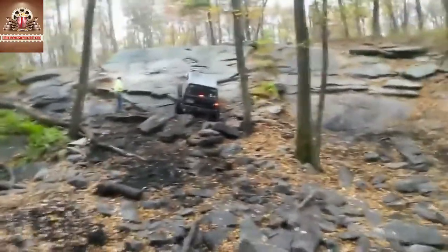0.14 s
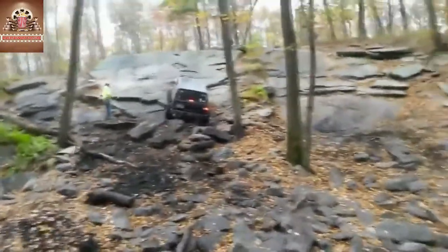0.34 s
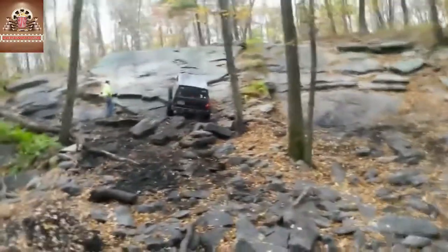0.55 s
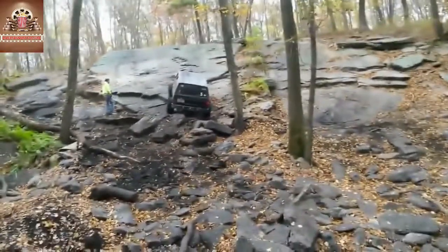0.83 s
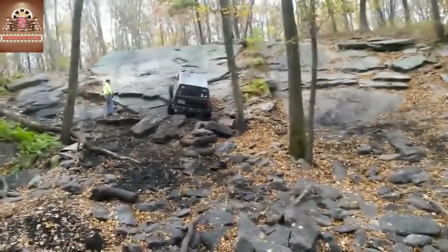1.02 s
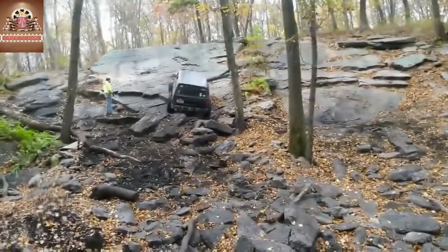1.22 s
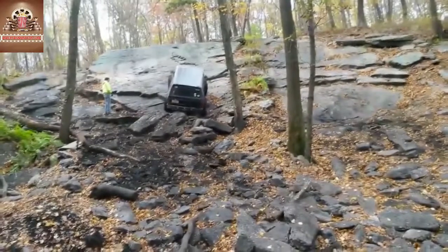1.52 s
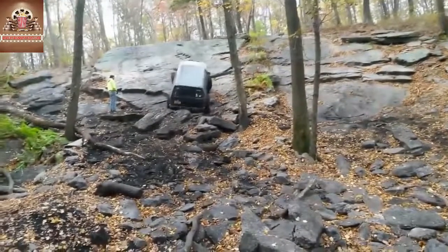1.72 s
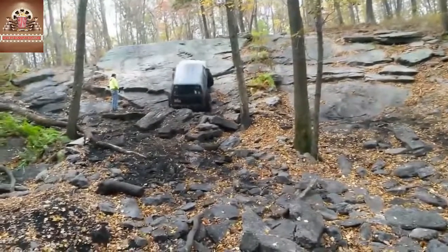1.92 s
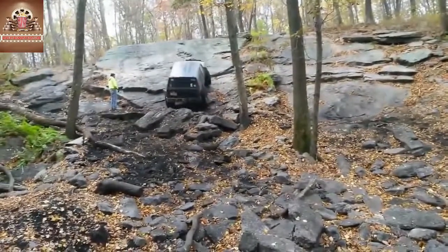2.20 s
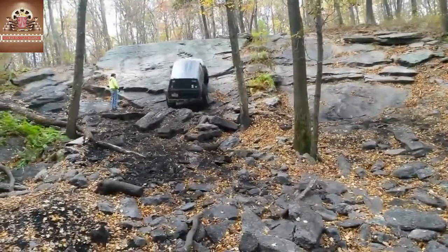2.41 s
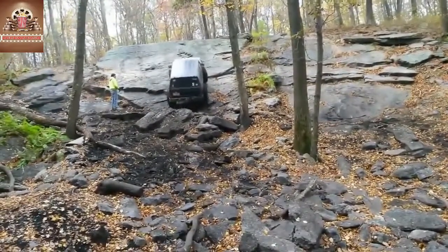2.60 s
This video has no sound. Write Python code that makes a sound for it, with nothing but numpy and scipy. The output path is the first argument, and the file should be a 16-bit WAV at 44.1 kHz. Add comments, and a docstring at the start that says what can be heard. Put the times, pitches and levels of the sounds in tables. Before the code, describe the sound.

In the woods, an off-road vehicle's engine goes from a soft chug to hard revving, popping briefly and climbing in pitch under a loud rush of air. Tyres slip on the rock ledge and a stone snaps once.

```python
"""Off-road vehicle climbing a rock ledge

A six-cylinder engine idles in the woods, then revs hard and climbs. The exhaust, a sum of multiples
of the engine cycle coloured by the pipe, goes from a chug through a few hard pops to a rising drone
that ends in a snarl, under a rush of fan and intake air. The tyres chirp and scuff on the rock and
a stone snaps once. Ledge and trunks echo the engine; a fine hiss lies behind."""
import sys
import numpy as np
from scipy import signal
from scipy.fft import rfft, irfft
from scipy.io import wavfile
from scipy.ndimage import uniform_filter1d

SR = 44100
rng = np.random.default_rng(int(sys.argv[2]) if len(sys.argv) > 2 else 0)


def unload_wav(signal):
    """Save mono or channel-first audio to the path in sys.argv[1] as 16-bit WAV at rate SR, clipped to [-1, 1]."""
    wavfile.write(
        sys.argv[1],
        SR,
        np.round(np.clip(np.atleast_2d(signal).T, -1, 1) * 32767).astype(np.int16),
    )


N = 121275
TIME = np.arange(N) / SR
CYLINDERS = 6

# exhaust pipe response: f/Hz, gain/dB
PIPE_RESPONSE = [(20, -34), (45, -11.5), (70, -1), (110, 3), (140, 4.5), (175, -5), (212, -3.5), (250, -13),
                 (290, -11.5), (390, -11.5), (470, -17), (510, -24.5), (560, -10.5), (590, -22.5),
                 (668, -15), (700, -26), (732, -15), (770, -24), (825, -12.5), (885, -20), (960, -16.5),
                 (1125, -23), (1350, -35), (2600, -36)]


def exhaust(firing_hz, firings, orders=60):
    """Under load the pipe sounds the firing tone, its overtones and uneven-firing lines between."""
    drone_levels = [(.8, -58, -60), (.86, -36, -28), (.905, -29, -17), (1.025, -13, -12),
                    (1.13, -16.5, -17), (1.204, -11, -27), (1.322, -9, -18), (1.39, -6.5, -22.5),
                    (1.5, -9.5, -27.5), (1.61, -12.5, -24.5), (1.70, -17, -26.5), (1.75, -13, -30),
                    (1.81, -16, -34), (2.09, -15.5, -28.5), (2.21, -14.5, -27.5), (2.36, -14.5, -26),
                    (2.45, -12, -47), (2.6, -13, -30), (2.64, -21, -25.5), (2.69, -15, -44),
                    (2.725, -28, -30)]  # t/s, firing tone/dB, octave/dB
    burble_levels = [(.8, -49, -40.5), (.9, -19.5, -45), (1.05, -32, -43), (1.2, -27.5, -31),
                     (1.6, -27, -38.5), (1.76, -39, -35), (1.98, -44, -30.5), (2.2, -32, -32),
                     (2.45, -38, -32.5), (2.65, -33, -26.5), (2.75, -40, -25)]  # t/s, higher overtones/dB, uneven firing/dB
    uneven_orders = [(1, -23), (2, -1), (4, -2), (5, 1.5), (7, 2), (8, 1), (10, 7), (14, 2), (20, -3),
                     (60, 4)]  # multiple of engine cycle, gain/dB
    overtones = [(3, 2), (4, -4), (5, -9), (6, -2.5), (7, -10.5), (12, -10)]  # multiple of firing rate, gain/dB
    odd_db = -5.5  # odd orders are weaker: the two banks fire in turn
    tone_db, octave_db = curves(drone_levels)
    overtone_gain, uneven_gain = amp(curves(burble_levels))
    out = amp(tone_db) * engine_order(firing_hz, firings, CYLINDERS, waver=.045)
    out += amp(octave_db) * engine_order(firing_hz, firings, 2 * CYLINDERS, waver=.19)
    for order in range(1, orders + 1):
        pipe_db = spectrum_at(PIPE_RESPONSE, firing_hz * order / CYLINDERS)
        if order % CYLINDERS:
            db = pipe_db + np.interp(order, *np.transpose(uneven_orders)) + odd_db * (order % 2)
            out += uneven_gain * amp(db) * engine_order(firing_hz, firings, order, waver=.32)
        elif order > 2 * CYLINDERS:
            db = pipe_db + np.interp(order / CYLINDERS, *np.transpose(overtones))
            out += overtone_gain * amp(db) * engine_order(firing_hz, firings, order, waver=.24)
    return out


def engine_order(firing_hz, firings, order, waver):
    """One wavering multiple of the engine cycle, phase-shifted by the pipe resonance."""
    pipe_hz, pipe_q, waver_hz = 133, 1.56, 7
    hz = firing_hz * order / CYLINDERS
    pipe_lag = 2 * np.arctan(pipe_q * (hz / pipe_hz - pipe_hz / hz))
    offset = 2 * np.pi * rng.random() * (order % CYLINDERS > 0)  # firing harmonics stay in step
    phase = 2 * np.pi * firings * order / CYLINDERS - pipe_lag + offset
    in_phase = 1 + waver * wander(waver_hz)
    quadrature = waver * wander(waver_hz)
    return -np.sqrt(2) * (in_phase * np.cos(phase) + quadrature * np.sin(phase))


def snarl(firing_hz, firings, surge_db=2.5, surge_hz=7):
    """At high revs even orders stand out, each surging alone and swelling through pipe resonances."""
    snarl_orders = [(16, 1), (18, -1), (20, -6), (22, 3), (24, 0), (26, -3), (28, -3), (30, -5), (34, -6)]  # multiple of engine cycle, gain/dB
    snarl_level = [(1.6, -45), (1.85, -31), (2.2, -29), (2.33, -24), (2.52, -22), (2.66, -17.5)]  # t/s, level/dB
    level_db, = curves(snarl_level)
    out = np.zeros(N)
    for order, order_db in snarl_orders:
        pipe_db = spectrum_at(PIPE_RESPONSE, firing_hz * order / CYLINDERS)
        gain = amp(level_db + order_db + pipe_db + surge_db * wander(surge_hz))
        out += gain * engine_order(firing_hz, firings, round(order), waver=.26)
    return out


def idle(firing_hz, firings, throttle_open_s=.894, opening_s=.048):
    """Even, quickly chugging hum that gives way as the throttle opens."""
    idle_orders = [(6, -47.5), (11, -45), (12, -37), (17, -35), (18, -34), (21, -37), (23, -32.5),
                   (24, -38), (30, -50), (36, -37.5)]  # multiple of engine cycle, level/dB
    closed = np.clip((throttle_open_s - TIME) / opening_s, 0, 1)
    return closed * sum(amp(db) * engine_order(firing_hz, firings, round(order), waver=.1)
                        for order, db in idle_orders)


def air(firings, rasp_depth=.56, rush_depth=.24, flicker_db=1.0, flicker_hz=34.3):
    """Exhaust rasp puffs with each firing; the rush of fan and intake throbs more gently."""
    air_levels = [(0, -37.5, -52.5), (.84, -39.5, -51.5), (.9, -31.5, -36), (.99, -29.5, -33.5),
                  (1.13, -28.5, -27), (1.33, -29.5, -27), (1.4, -30, -28.5), (1.52, -30.5, -31),
                  (1.68, -35.5, -31), (1.8, -35, -31), (2.03, -29.5, -27.5), (2.12, -34.5, -25.5),
                  (2.21, -33.5, -28), (2.42, -31, -25.5), (2.56, -27, -23), (2.69, -26.5, -22.5),
                  (2.75, -20.5, -20)]  # t/s, rasp/dB, rush/dB
    rasp_colour = [(25, -30), (70, -13), (130, 9.5), (250, 9), (330, 8.5), (470, 9), (700, 1.5), (825, 6),
                   (885, -2.5), (1000, -10), (1150, -18), (1400, -26), (2400, -13), (4000, -19),
                   (9000, -67)]  # f/Hz, relative density/dB
    rush_colour = [(200, -38), (1000, -3), (1400, -5), (1900, 0.5), (2700, -0.05), (3800, -4), (4950, -1),
                   (5450, 5), (5900, 1), (6300, -2), (7300, -9), (9200, -17.5), (12000, -17.5),
                   (14500, -46)]  # f/Hz, relative density/dB
    rasp_db, rush_db = curves(air_levels)
    puff = unit(np.exp(-(firings % 1) / .7))  # decays over 0.7 firing periods
    rasp = noise(rasp_colour) * unit(1 - rasp_depth + rasp_depth * puff) * amp(rasp_db)
    rush = patchy(noise(rush_colour)) * unit(1 - rush_depth + rush_depth * puff) * amp(rush_db)
    return (rasp + rush) * amp(flicker_db * wander(flicker_hz))


def pops(rise_s=.001, decay_s=.008):
    """The first firings under load crack out of the tailpipe."""
    pop_events = [(.878, -34), (.902, -27), (.924, -28.5), (.945, -25), (.965, -26.5), (.984, -33),
                  (1.001, -32), (1.018, -32)]  # t/s, relative level/dB
    pop_colour = [(150, -16), (400, -4), (650, -3), (850, 1), (1020, -1.5), (1350, -12), (2300, -8),
                  (3200, -19), (7000, -28), (14000, -50)]  # f/Hz, relative density/dB
    envelope = np.zeros(N)
    for onset_s, db in pop_events:
        age_s = np.maximum(TIME - onset_s, 0)
        envelope += amp(db) * (1 - np.exp(-age_s / rise_s)) * np.exp(-age_s / decay_s)
    return 2 * envelope * noise(pop_colour)


def stone(snap_s=1.4316):
    """A stone snaps under a tyre; its bright modes ring very briefly."""
    modes = [(3820, -16, 0.0031), (5420, -3, 0.0027), (11300, -19, 0.0037)]  # f/Hz, level/dB, t60/s
    age_s = np.maximum(TIME - snap_s, 0)
    return sum(amp(db) * np.exp(-np.log(1000) * age_s / t60_s) * np.sin(2 * np.pi * hz * age_s)
               for hz, db, t60_s in modes)


def tyres(grain_db=3, grain_hz=200):
    """Rubber slips on rock in gritty bursts: chirps as it takes up the load, scuffs later."""
    scuffs = [(2.06, 0.0077, -37), (2.105, .018, -36)]  # t/s, width/s, level/dB
    scuff_colour = [(1000, -22), (4000, -8), (6000, -12), (9000, 5), (13000, 5), (15000, -5)]  # f/Hz, relative density/dB
    chirps = [(.946, .003, -31), (1.078, 0.005, -29), (1.092, 0.005, -27.5)]  # t/s, width/s, level/dB
    chirp_colour = [(1200, -20), (1900, -3), (2450, 4), (2900, 0), (3600, -20)]  # f/Hz, relative density/dB
    out = np.zeros((2, N))
    for slips, colour in (scuffs, scuff_colour), (chirps, chirp_colour):
        envelope = sum(amp(db) * bump(at_s, width_s) for at_s, width_s, db in slips)
        out += envelope * unit(noise(colour) * amp(grain_db * wander(grain_hz)))
    return out


def echoes(x, count=45, level_db=-6.5, t60_s=.11, highpass_hz=540):
    """Sparse reflections from rock and trunks colour the treble differently at each microphone."""
    delay_s = rng.uniform(.002, .09, (2, count))
    gains = rng.choice([-1., 1.], (2, count)) * np.exp(-np.log(1000) * delay_s / t60_s)
    gains /= np.linalg.norm(gains, axis=1, keepdims=True)
    taps = np.zeros((2, SR // 10))
    np.put_along_axis(taps, (delay_s * SR).astype(int), gains, 1)
    treble = signal.sosfilt(signal.butter(2, highpass_hz, "high", fs=SR, output="sos"), x)
    return amp(level_db) * signal.oaconvolve(treble, taps, axes=1)[:, :N]


def hiss():
    """Fine background hiss, swelling towards the end."""
    hiss_level = [(.85, -40.5), (1.2, -43.5), (1.9, -45), (2.75, -31)]  # t/s, level/dB
    hiss_colour = [(100, 18), (1000, 4), (2500, 0), (4000, -5.5), (7000, -4.5), (9000, -3), (12000, 0),
                   (14500, -6)]  # f/Hz, relative density/dB
    return amp(curves(hiss_level)) * noise(hiss_colour)


def noise(colour):
    """Coloured noise of rms 1 at two microphones, less alike in the treble."""
    likeness = [(100, 1), (300, 0.91), (550, 1), (1000, 0.26), (2000, 0.33), (5000, 0.16), (9000, 0.45)]  # f/Hz, left-right correlation
    hz = np.fft.rfftfreq(N, 1 / SR)
    left, independent = rfft(rng.standard_normal((2, N)))
    correlation = np.clip(spectrum_at(likeness, hz), -1, 1)
    right = correlation * left + np.sqrt(1 - correlation ** 2) * independent
    return unit(irfft(np.array([left, right]) * amp(spectrum_at(colour, hz)), N))


def patchy(x, depth_db=1.5):
    """Patches of about 500 Hz by 40 ms surge and fade independently; output rms 1."""
    spectra = signal.stft(x, nperseg=512, noverlap=384)[2]
    field = rng.standard_normal(spectra.shape[:0:-1]).T  # bins by frames
    field = uniform_filter1d(field, 6, axis=0)
    field = uniform_filter1d(field, 14, axis=1)
    spectra *= amp(depth_db * unit(field))
    return unit(signal.istft(spectra, nperseg=512, noverlap=384)[1][:, :N])


def wander(rate_hz, hop=64):
    """Smooth random motion of rms 1."""
    frames = N // hop + 2
    hz = np.fft.rfftfreq(frames, hop / SR)
    slow = irfft(rfft(rng.standard_normal(frames)) / (1 + (hz / rate_hz) ** 4), frames)
    return np.interp(np.arange(N) / hop, np.arange(frames), unit(slow))


def bump(at_s, width_s):
    """Gaussian envelope of peak 1."""
    return np.exp(-.5 * ((TIME - at_s) / width_s) ** 2)


def curves(table):
    """Columns of a time table, per sample."""
    times_s, *columns = np.transpose(table)
    return [np.interp(TIME, times_s, column) for column in columns]


def spectrum_at(table, hz):
    """Spectrum table interpolated in log frequency."""
    knots_hz, values = np.transpose(table)
    return np.interp(np.log(hz + 1), np.log(knots_hz), values)


def amp(db):
    """Decibels to gain."""
    return 10 ** (np.asarray(db) / 20)


def unit(x):
    """Scales to rms 1."""
    return x / np.sqrt(np.mean(abs(x) ** 2) + 1e-20)


def scene():
    """Engine with echoes, tyres and hiss; their level dips briefly around the stone's snap."""
    engine_speed = [(0, 36.3), (.45, 34.9), (.81, 35.4), (.89, 42), (.955, 50.5), (1.022, 61.8),
                    (1.1, 76.3), (1.204, 92.3), (1.322, 106), (1.414, 117), (1.604, 134.5), (1.74, 146),
                    (1.81, 163.5), (1.89, 174.5), (2.03, 169.3), (2.11, 170.5), (2.28, 196.5),
                    (2.43, 202.5), (2.58, 213), (2.67, 223), (2.75, 228)]  # t/s, firing rate/Hz
    firing_at_s, pipe_delay_s = .901, .003044
    jitter_firings, jitter_hz, dip_db = .007, 30, -6.5
    firing_hz, = curves(engine_speed)
    firings = np.cumsum(firing_hz) / SR
    firings -= np.interp(firing_at_s, TIME, firings)  # one firing falls on this instant
    at_tailpipe = firings - pipe_delay_s * firing_hz + jitter_firings * wander(jitter_hz)
    tones = idle(firing_hz, at_tailpipe) + exhaust(firing_hz, at_tailpipe) + snarl(firing_hz, at_tailpipe)
    engine = tones + air(firings)
    dip = amp(dip_db * bump(at_s=1.426, width_s=.014))
    return dip * (engine + echoes(engine) + pops() + tyres() + hiss()) + stone()


def record(dry, cutoff_hz=14700):
    """Left microphone brighter near 5 kHz but deaf above 8 kHz; both low-passed."""
    balance = [(60, -1.6), (120, -2.6), (350, -3.8), (750, -.5), (1300, 1.5), (2400, 0), (4300, 5.9),
               (5400, 9), (6700, 2), (8100, 0), (8600, -17), (14000, -19)]  # f/Hz, left minus right/dB
    ratio = amp(spectrum_at(balance, np.fft.rfftfreq(2 * N, 1 / SR)))
    mic_gains = np.array([ratio, np.ones_like(ratio)]) * np.sqrt(2 / (1 + ratio ** 2))
    heard = irfft(rfft(dry, 2 * N) * mic_gains)[:, :N]
    lowpass = signal.firwin(255, cutoff_hz, window=("kaiser", 9), fs=SR)
    return signal.oaconvolve(heard, lowpass[None], "same")


dry = scene()
out = record(dry)
unload_wav(out)
```